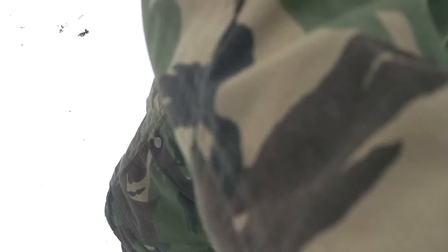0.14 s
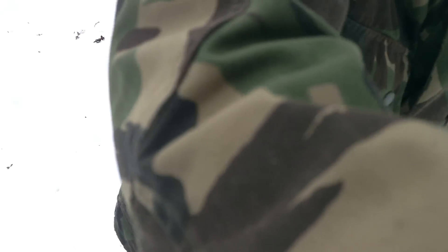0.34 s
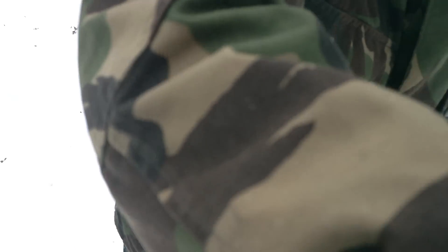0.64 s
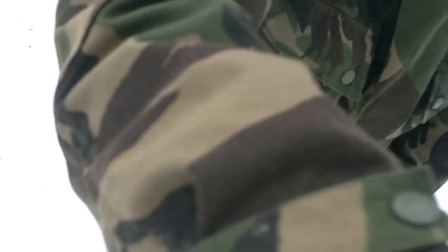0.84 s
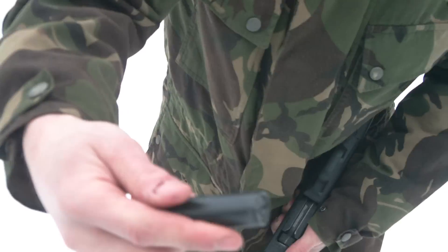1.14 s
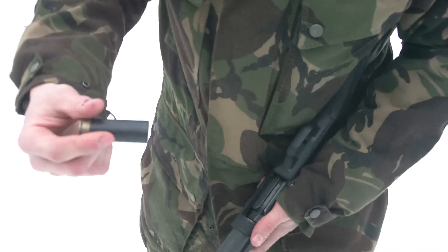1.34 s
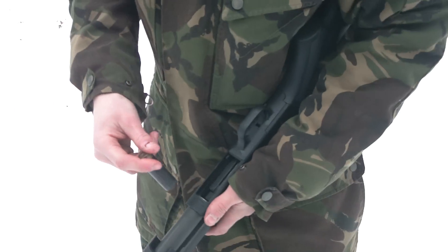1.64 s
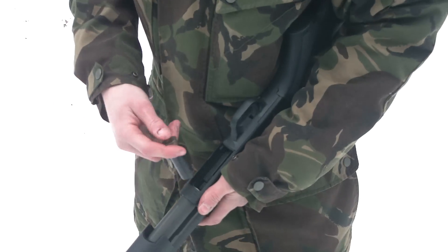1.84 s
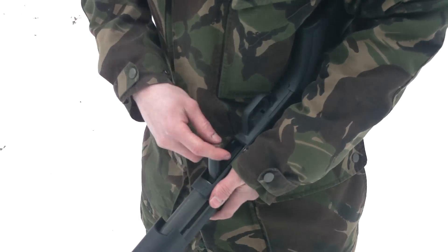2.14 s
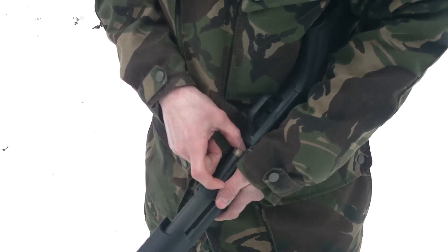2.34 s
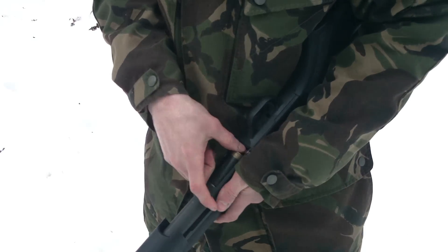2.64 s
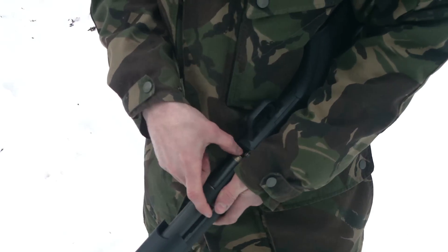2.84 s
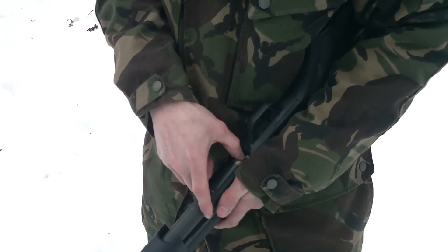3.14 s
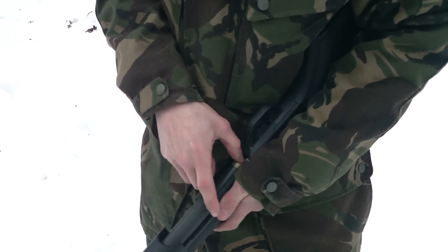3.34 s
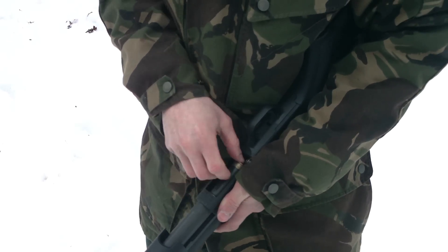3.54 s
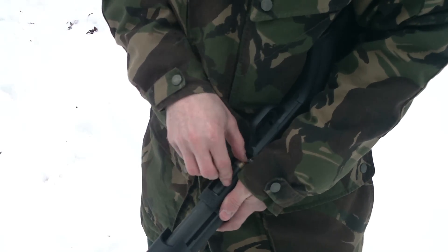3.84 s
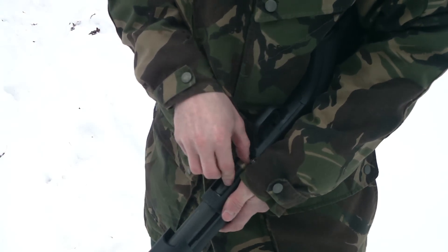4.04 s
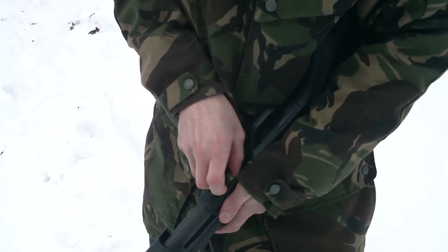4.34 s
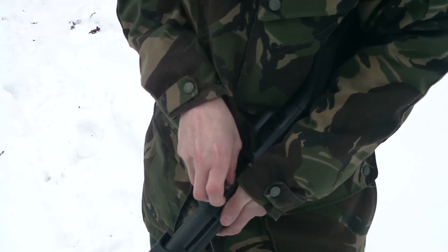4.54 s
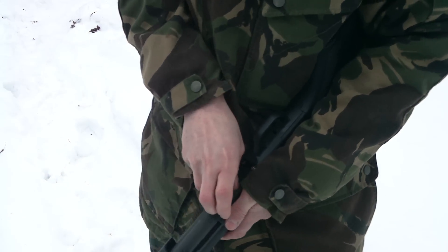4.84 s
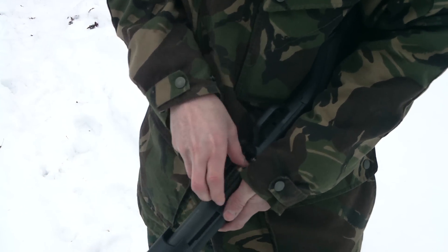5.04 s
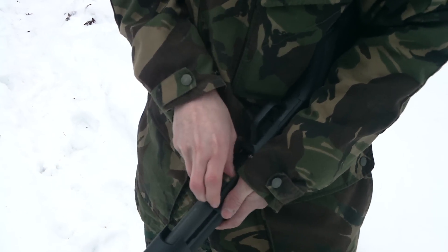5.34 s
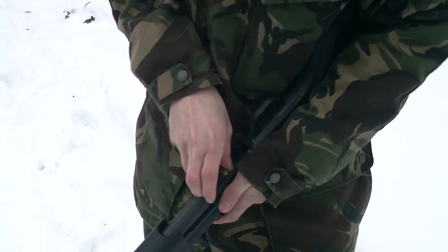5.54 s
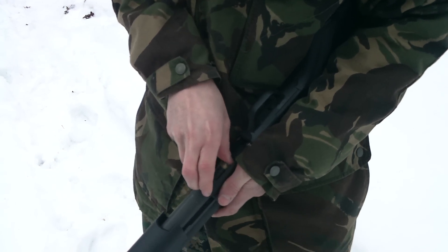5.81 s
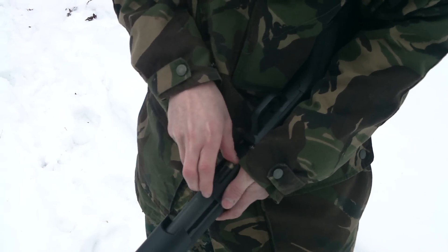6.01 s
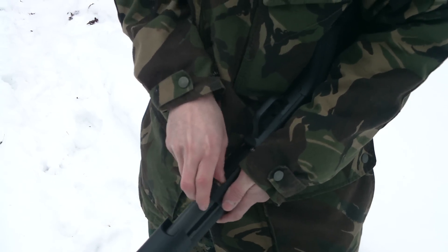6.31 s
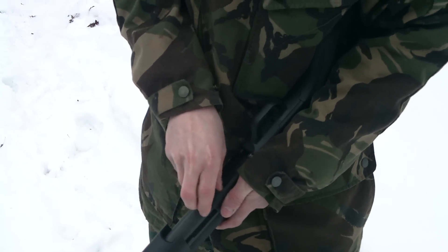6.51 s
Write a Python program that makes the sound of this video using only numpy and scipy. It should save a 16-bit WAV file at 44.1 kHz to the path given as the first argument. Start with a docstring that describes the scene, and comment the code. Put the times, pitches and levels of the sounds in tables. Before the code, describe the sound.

Outdoors, close and dry in stereo, with light hiss and a faint far rumble. From about 0.25 to 1 s a stiff jacket rustles and gives soft, dull padded knocks; a very loud, sharp steel snap hits at 0.77 s. Smaller cloth movements and muffled bumps follow at 1.3, 1.45 and 1.7 s, then the background drops. At 2.25-2.55 s a shell clicks and scrapes briefly on steel, with a crisp single click at 2.93 s. Faint ticks lead to small click clusters at 3.95-4.55 s with short gritty slides. A strong, bright metallic rattle comes at 5.15-5.4 s, while deep wind gusts begin buffeting the microphone. Around 6-6.3 s a slow hollow drag carries faint rising squeaks, followed by hard clicks and rasping slides at 6.2-6.45 s and a last small click at 6.65 s.

```python
"""Shells being thumbed into a shotgun's magazine tube are the main sound, outdoors on snow.
Their rims click and slide on steel: short bursts and dense grit ring the steel and the hollow tube.
The person's stiff jacket rustles and knocks close by: grains of slipping cloth and soft padded blows.
A slow push adds a hollow drag and faint squeaks; far rumble, hiss and gusts are shaped noise below."""
import sys
import numpy as np
from scipy import signal
from scipy.io import wavfile
from scipy.ndimage import map_coordinates

SR = 44100
rng = np.random.default_rng(int(sys.argv[2]) if len(sys.argv) > 2 else 0)


def wrap_up_sound(samples):
    """Save the sound to the file named by the first command line argument, as 16-bit audio."""
    columns = np.atleast_2d(samples).T
    # keep every value between -1 and 1, then stretch to whole-number steps
    tamed = np.clip(columns, -1, 1)
    steps = np.round(tamed * 32767).astype(np.int16)
    wavfile.write(sys.argv[1], SR, steps)


N = 294367
TIME = np.arange(N) / SR

# background of jacket rustle, hiss and far rumble, louder early and quieter after 1.76 s:
# start_s, hiss_db, rumble_db
AIR_LEVELS = [(0, -39, -44.5), (.3, -43.5, -47), (.69, -46.5, -47), (1.4, -48.5, -49.5), (1.7, -47, -48),
              (1.76, -55, -49.5), (4.1, -55, -49.5), (4.57, -52, -50), (6.67, -56.5, -49)]
# gusts on the microphone: start_s, level_db
WIND_LEVELS = [(0, -45), (.37, -49.5), (1.26, -49), (4.36, -50.5), (4.55, -43.5), (4.75, -47), (5.1, -31.5),
               (5.28, -40), (5.35, -27), (5.5, -32.5), (5.7, -38), (5.79, -29.5), (5.84, -36), (5.93, -29),
               (6.02, -44), (6.21, -34), (6.3, -34.5), (6.39, -27), (6.52, -38), (6.67, -48)]
# noise spectra, relative: pitch_hz, level_db (per Hz)
HISS_SPECTRUM = [(700, -3.5), (1500, -3), (2500, -3), (5000, -3), (9000, -5), (12000, -11.5), (15000, -1)]
RUMBLE_SPECTRUM = [(60, 4.5), (130, 2), (250, -2), (500, -3.5), (800, -7.5), (1200, -13.5), (2000, -18),
                   (4000, -29)]
GUST_SPECTRUM = [(18, 7.5), (35, -1), (60, -4), (100, -15.5), (170, -29.5), (300, -74)]
# how alike left and right are in the noises: pitch_hz, likeness (no unit; 1 = the same)
LEFT_RIGHT_LIKENESS = [(30, 0.11), (80, 0.15), (150, 0.52), (380, 0.69), (950, 0.76), (2400, 0.47),
                       (6000, 0.34), (15000, 0.016)]
# stiff cloth rubbing, one row a movement: full_level_s, rise_s, hold_s, fall_t60_s, level_db, creak_hz
RUSTLE_MOVES = [(.265, 0.0074, 0.017, 0.23, -39.5, 830), (0.475, .01, 0.058, 0.081, -43.5, 726),
                (0.605, 0.041, 0.011, 0.13, -38, 634), (0.68, 0.053, .02, 0.055, -44, 686),
                (0.756, 0.072, 0.0098, 0.063, -30, 1680), (0.77, 0.028, 0.029, 0.33, -43, 890),
                (0.916, 0.056, 0.0068, .2, -46, 1030), (1.281, 0.022, 0.088, .12, -44, 705),
                (1.703, .02, 0.013, 0.033, -41, 690)]
# soft knocks of hand and jacket: start_s, level_db, pitch_hz, bright_edge_db (relative), t60_s
SOFT_KNOCKS = [(0.27, -24.5, 237, -2, 0.018), (0.338, -27.5, 1080, -0.5, 0.074),
               (0.339, -32.5, 124, -30, 0.071), (0.288, -27.5, 230, -4, 0.088),
               (0.385, -34, 108, -30, 0.068), (0.414, -21.5, 265, 5.5, 0.033),
               (0.455, -29, 1180, -11, 0.037), (0.475, -22.5, 270, -32, 0.063),
               (0.618, -35, 1100, 4, 0.025), (0.695, -26, 670, -25, 0.075), (0.786, -24.5, 240, -11, 0.029),
               (0.84, -27.5, 467, -0.5, 0.046), (0.928, -28, 1010, -31, 0.15), (0.94, -26, 229, -4, 0.021),
               (0.95, -30.5, 117, -30, 0.14), (1.287, -25, 253, -8.5, 0.12),
               (1.454, -21.5, 610, -43, 0.043), (1.697, -34, 689, -29, 0.057)]
# shell and steel contacts: start_s, level_db, snap_hz, shell_body_db (relative),
# treble_db (relative), chatter_t60_s
SHELL_CLICKS = [(0.6604, -19.5, 7200, -26, -18, 0.015), (0.7672, 2, 4240, -24, -15, 0.0084),
                (0.806, -28, 5500, -4, -19, 0.036), (2.071, -44, 2250, 20.5, -4, 0.036),
                (2.2578, -12, 4970, -4, -6.5, 0.0039), (2.3045, -32, 1890, 10, -13, 0.039),
                (2.352, -40, 4000, 5, -11, 0.016), (2.3855, -13.5, 2730, -11.5, -20, 0.012),
                (2.397, -25, 2600, -20, -25, 0.012), (2.451, -18, 2720, -12, -30, 0.014),
                (2.552, -34, 4800, -25, -1.5, 0.0058), (2.8727, -50, 1720, 22, 15, 0.03),
                (2.9291, -9, 4070, -51, -43, 0.0044), (3.3313, -42, 2800, 9, -27, 0.056),
                (3.4531, -40, 2640, 10, -1, 0.02), (3.6874, -30, 2900, -3, -33.5, 0.015),
                (3.9422, -19, 3980, -16, -14, 0.011), (4.0364, -15.5, 5000, -17, -8.5, 0.028),
                (4.0408, -19, 7400, -5, -17, 0.031), (4.2553, -24.5, 3130, -10, -8.5, 0.014),
                (4.297, -37, 4500, -15, -8, 0.015), (4.39, -19, 3470, -14, -31, 0.027),
                (4.397, -19, 3980, -20, -26, 0.031), (4.4004, -29, 6230, 8, 1.5, 0.019),
                (4.5153, -16.5, 4940, -32, 1, 0.0039), (4.556, -16, 3700, -5.5, -6, 0.027),
                (4.65, -48.5, 2230, 23.5, 4, 0.024), (5.1682, -17, 2930, -10, -12, 0.036),
                (5.175, -19, 6350, -28, -3, 0.032), (5.212, -18.5, 2720, -20, -9, 0.019),
                (5.2187, -8, 7000, -31, -17, 0.03), (5.221, -6, 3650, -14, -2.5, 0.03),
                (5.2257, -9, 4160, -15, -17, 0.023), (5.279, -33, 3930, -25, -25, 0.008),
                (5.3252, -14.5, 4000, -26, -18, 0.026), (5.3505, -5.5, 4460, -12.5, -11.5, 0.019),
                (5.3771, -6.5, 6300, -9, -7, 0.0042), (5.7437, -37, 3280, 12.5, -25, 0.026),
                (5.937, -41, 3030, 4, -3, 0.011), (6.1846, -17.5, 3260, -32, -12.5, 0.012),
                (6.319, -7.5, 4060, -19, -3.5, 0.021), (6.337, -12.5, 3800, -1, -6.5, 0.026),
                (6.405, -11.5, 4670, -12, -3, 0.053), (6.4213, -14.5, 2100, -3, -13, 0.008),
                (6.6474, -28, 5170, 6, 3, 0.027)]
# resonances of receiver, spring and shell: pitch_hz, width_hz, level_db
STEEL_MODES = [(1520, 150, 0), (2100, 450, -5), (2600, 90, 4.5), (3040, 150, -1), (3520, 200, -5),
               (3950, 180, -2), (4380, 190, -1.5), (4830, 180, -1), (5600, 300, -4), (6250, 350, -2),
               (6950, 200, -2)]
# treble resonances of the same contacts: pitch_hz, width_hz, level_db
STEEL_TREBLE_MODES = [(8620, 350, 7), (9370, 620, 3.5), (12130, 1830, 12), (12760, 4860, 6),
                      (16100, 430, 3)]
# dull body of a struck shell and the tube behind it: pitch_hz, width_hz, level_db
SHELL_MODES = [(755, 600, -1.4), (1003, 92, -1.6)]
# shell sliding on steel, one row a stroke: full_pressure_s, rise_s, hold_s, fall_t60_s, level_db,
# pitch_hz, tube_db (relative)
SLIDE_STROKES = [(2.253, 0.001, 0.0039, 0.048, -33, 3140, -2),
                 (2.386, 0.0023, 0.018, 0.057, -39.5, 2520, -6.5),
                 (2.45, 0.00081, 0.0025, 0.13, -39, 3300, -11.5),
                 (4.384, 0.0083, 0.017, 0.065, -42.5, 3570, 4),
                 (4.411, 0.0074, 0.046, 0.088, -51.5, 4100, 9),
                 (4.497, 0.038, 0.012, 0.027, -49.5, 4200, 1),
                 (4.514, 0.0065, 0.0053, 0.16, -35.5, 4030, 2.5),
                 (5.159, 0.039, 0.072, 0.096, -38, 3600, -1), (5.241, .01, 0.078, 0.043, -57.5, 3460, 1),
                 (5.322, 0.037, 0.048, 0.12, -36, 3170, 1.5),
                 (5.376, 0.0051, 0.00088, 0.011, -22.5, 5200, -28),
                 (5.992, 0.061, 0.03, 0.12, -53.5, 3870, 5.5), (6.184, 0.19, 0.049, 0.13, -52.5, 4000, 7.5),
                 (6.316, 0.018, 0.03, 0.024, -28.5, 3500, -2), (6.394, 0.034, 0.028, 0.062, -31, 4420, 4),
                 (6.471, 0.047, 0.061, 0.17, -53, 4550, 6), (6.599, 0.021, 0.024, 0.03, -53.5, 4030, 12.5),
                 (6.647, 0.027, .008, 0.051, -36, 3730, 1.5)]
# air in the magazine tube: pitch_hz, width_hz, level_db
TUBE_MODES = [(593, 72, -9), (704, 63, -14), (992, 110, 2)]
# hollow body of a shell pushed slowly along the port: start_s, pitch_hz, level_db
DRAG_PATH = [(5.97, 557, -64), (6.05, 740, -54), (6.14, 600, -47.5), (6.26, 615, -50), (6.33, 520, -52)]
# faint rising tones in one slow stroke: full_level_s, rise_s, hold_s, fall_t60_s, level_db, pitch_hz
SQUEAK_TONES = [(6.055, .03, .085, .05, -63, 2250), (6.05, .03, .21, .05, -65, 3540)]

WIND_PAN_DB = 1.5   # the left port is more exposed
RISE_DB = 30.5      # a movement swells up from this far below its level
CREAK_DB_PER_OCTAVE, CREAK_WANDERS_OCTAVES = -45, .12   # fall-off around the creak, and its wandering
FOLDS_DB, FOLDS_DB_PER_OCTAVE = -12, -1                 # the other folds, level given at 600 Hz
GRIT_PER_S, GRIT_SPREAD_DB = 4300, 2
GRIP_SPREAD_DB = 1.5     # each grip damps other modes
TUBE_FLUTTER_DB = 4      # the shell opens and blocks the tube as it moves
SLIDE_TREBLE_DB, TREBLE_DB_PER_OCTAVE = -5, 14   # treble of a 4 kHz stroke; brighter strokes carry more
RASP_DB, TREBLE_RASP_DB = 1.5, -2   # bare rasp beside the steel modes and beside their treble
DRAG_LOWPASS_HZ = 130    # the band reaches this far to each side of its pitch
SQUEAK_HZ_PER_S, SQUEAK_WAVER_HZ, SQUEAK_FLUTTER_DB = 600, 30, 2.5
# the person leans in on one side: left leads, until the step back brings both sides level in time
SIDE_LEAD_S, STEP_FROM_S, STEP_TO_S = .000043, .9, 1.1
PAN_DB = 0.64            # left stays this much louder throughout
ECHO_S, ECHO_DB = 0.0049, -22
SCATTER_DB, SCATTER_HZ = -6, 6750
SCATTER_PER_S = 9.7      # hands and sleeves keep moving


def amp(db):
    """Turn a level in dB into a gain."""
    return 10 ** (np.asarray(db) / 20)


def rms_one(x):
    """Scale to an average strength (rms) of 1."""
    return x / np.sqrt(np.mean(x ** 2) + 1e-20)


def peak_one(x):
    """Scale to a peak of 1."""
    return x / np.max(np.abs(x))


def in_time(rows):
    """Draw straight lines between the rows of a table, giving one value per sample and column."""
    s, *columns = np.transpose(rows)
    return np.array([np.interp(TIME, s, c) for c in columns])


def at_hz(points, hz):
    """Read a spectrum at a pitch, with pitch on a log axis."""
    table = np.array(points)
    return np.interp(np.log(hz), np.log(table[:, 0]), table[:, 1])


def drift(rate):
    """Slow random wandering of spread 1: smoothed noise, made once every 40 samples."""
    r = np.exp(-80 * np.pi * rate / SR)
    white = rng.standard_normal(N // 40 + 2002)
    slow = signal.lfilter([1], [1, -2 * r, r * r], white)[2000:]   # skip the filter's start
    return np.interp(np.arange(N) / 40, np.arange(len(slow)), rms_one(slow))


def resonate(x, modes, extra_db=0):
    """Ring several resonances side by side, with alternating signs; narrow ones ring longer."""
    out = 0
    extra_db = extra_db + np.zeros(len(modes))
    for k, ((hz, width, db), more_db) in enumerate(zip(modes, extra_db)):
        r = np.exp(-np.pi * width / SR)
        poles = [1, -2 * r * np.cos(2 * np.pi * hz / SR), r * r]
        ring = signal.lfilter([(1 - r * r) / 2, 0, (r * r - 1) / 2], poles, x)
        out = out + (-1) ** k * amp(db + more_db) * ring
    return out


def add(out, sound, s):
    """Mix a short sound in at time s."""
    at = round(s * SR)
    out[at:at + len(sound)] += sound[:N - at]


def movement(s, rise_s, hold_s, t60, db):
    """Span and gain of a movement that swells, holds and dies away."""
    rise_s, hold_s, t60 = np.maximum([rise_s, hold_s, t60], .001)
    span = slice(int((s - rise_s) * SR), min(int((s + hold_s + t60) * SR), N))
    t = TIME[span] - s
    swell_db = RISE_DB * np.minimum(t / rise_s, 0)
    fall_db = -60 * np.maximum(t - hold_s, 0) / t60
    return span, amp(db + swell_db + fall_db)


def grit(per_s, spread_db, clumps_db):
    """Tiny random contacts of uneven size that come in louder and softer clumps."""
    sizes = amp(spread_db * np.minimum(rng.exponential(1, N), 5)) * rng.choice([-1, 1], N)
    touching = rng.random(N) < per_s / SR
    return sizes * touching * amp(clumps_db * drift(71)) + 1e-18


def banded_noise(spectrum, patchy_db, flicker):
    """Half-octave bands of stereo noise, each with its own level, flicker and likeness; rms 1."""
    lowest = spectrum[0][0]
    edges = lowest * 2 ** np.arange(0, np.log2(16000 / lowest), .5)
    out, together, white = 0, drift(1.16), rng.standard_normal((2, 2, N))
    for k, low in enumerate(edges[edges < spectrum[-1][0]]):
        high = min(low * np.sqrt(2), .45 * SR)
        band = signal.butter(2, [low, high], "band", fs=SR, output="sos")
        mid, side = signal.sosfilt(band, white[k % 2])   # neighbouring bands use separate noise
        hz = np.sqrt(low * high)
        alike = np.clip(at_hz(LEFT_RIGHT_LIKENESS, hz), -1, 1)
        gain = amp(at_hz(spectrum, hz) + patchy_db * (.4 * together + drift(flicker)))
        out = out + gain * (np.sqrt(1 + alike) * mid + np.sqrt(1 - alike) * side * [[1], [-1]])
    return rms_one(out)


def air():
    """Jacket rustle, hiss and far rumble: two wide stereo noises, louder early and quieter later."""
    hiss_db, rumble_db = in_time(AIR_LEVELS)
    hiss = amp(hiss_db) * banded_noise(HISS_SPECTRUM, patchy_db=2.0, flicker=11.0)
    return hiss + amp(rumble_db) * banded_noise(RUMBLE_SPECTRUM, patchy_db=.6, flicker=9)


def wind():
    """Gusts press on the microphone as deep, patchy noise, stronger at the left port."""
    ports = amp([[WIND_PAN_DB / 2], [-WIND_PAN_DB / 2]])
    gusts = banded_noise(GUST_SPECTRUM, patchy_db=3.5, flicker=16.0)
    return ports * amp(in_time(WIND_LEVELS)[0]) * gusts


def rustle():
    """Folds of cloth slip in clumped grains; folds near the creak pitch speak loudest."""
    slips, out = grit(1500, 3.5, clumps_db=3), np.zeros(N)
    pitches = np.geomspace(200, 4500, num=32)   # one per fold, in Hz
    folds = np.array([(-1) ** k * rms_one(resonate(slips, [(hz, .09 * hz, 0)]))
                      for k, hz in enumerate(pitches)])
    others_db = FOLDS_DB + FOLDS_DB_PER_OCTAVE * np.log2(pitches / 600)
    wander = CREAK_WANDERS_OCTAVES * drift(45)
    for *shape, creak_hz in RUSTLE_MOVES:
        span, level = movement(*shape)
        octaves_off = np.abs(np.log2(creak_hz / pitches)[:, None] + wander[span])
        fold_db = np.maximum(CREAK_DB_PER_OCTAVE * octaves_off, others_db[:, None])
        out[span] += level * np.sum(amp(fold_db) * folds[:, span], axis=0)
    return out


def knocks():
    """A soft blow on padded cloth: a push and a dying puff around one dull pitch, with a bright edge."""
    out, t = np.zeros(N), np.arange(6000) / SR
    chance = rng.standard_normal((len(SOFT_KNOCKS), len(t)))
    for (s, db, hz, bright_db, t60), draw in zip(SOFT_KNOCKS, chance):
        soft_start = np.minimum(t / 0.00086, 1) ** 2
        force = draw * amp(-60 * t / max(t60, .002)) * soft_start + 1e-18
        # the push, once the padding is pressed flat
        force += 1.75 * np.exp(-((t - .0025) / 0.00023) ** 2)
        body = resonate(force, [(hz, 0.26 * hz, 0), (250, 60, -2), (0.57 * hz, hz, -14)])
        edge = resonate(force, [(2090, 4940, -0.71), (2780, 4350, -1.36)])
        add(out, amp(db) * (peak_one(body) + amp(bright_db) * peak_one(edge)), s)
    return out


def steel(force, hz, chance_db=0):
    """Ring the steel modes, strongest near the pitch that the contact excites."""
    octaves_off = np.abs(np.log2(np.array(STEEL_MODES)[:, 0] / hz))
    return resonate(force, STEEL_MODES, -13 * octaves_off + chance_db)


def clicks():
    """A hard touch and a few ms of uneven bounces: a broad snap, with steel and shell ringing behind."""
    out, t = np.zeros(N), np.arange(3000) / SR
    chance = rng.standard_normal((len(SHELL_CLICKS), 3100))   # bounces, then chance for the modes
    for (s, db, hz, body_db, treble_db, t60), draw in zip(SHELL_CLICKS, chance):
        bounces = draw[:len(t)]
        force = bounces * np.abs(bounces) * amp(-60 * t / max(t60, .001)) + 1e-18
        treble_chance_db = 1.0 * draw[len(t):][:len(STEEL_TREBLE_MODES)]
        treble = resonate(force, STEEL_TREBLE_MODES, treble_chance_db)   # the chatter is bright
        force[0] = 16      # the first touch is the hardest
        broad = [(hz, 0.85 * hz, 0)]
        snap = peak_one(resonate(resonate(force, broad), broad))
        ring = peak_one(steel(force, hz, 1.5 * draw[-len(STEEL_MODES):]))
        sound = peak_one(snap + amp(-4.5) * ring)
        sound += amp(treble_db) * peak_one(treble)
        sound += amp(body_db) * peak_one(resonate(force, SHELL_MODES))
        add(out, amp(db) * sound, s)
    return out


def slides():
    """Dense grit, shed as a shell rubs along steel, rings steel and tube."""
    rub = grit(GRIT_PER_S, GRIT_SPREAD_DB, clumps_db=2.2)
    tube = rms_one(resonate(rub, TUBE_MODES))
    tube = rms_one(tube * amp(TUBE_FLUTTER_DB * drift(30)))
    # the same contacts with random signs, so that rasp and ringing do not cancel
    loose = rub * rng.choice([-1, 1], N)
    bare = signal.sosfilt(signal.butter(3, 8200, "high", fs=SR, output="sos"), loose)
    treble = rms_one(resonate(rub, STEEL_TREBLE_MODES)) + amp(TREBLE_RASP_DB) * rms_one(bare)
    out = np.zeros(N)
    grips = GRIP_SPREAD_DB * rng.standard_normal((len(SLIDE_STROKES), len(STEEL_MODES)))
    for (*shape, hz, tube_db), grip_db in zip(SLIDE_STROKES, grips):
        span, level = movement(*shape)
        treble_db = SLIDE_TREBLE_DB + TREBLE_DB_PER_OCTAVE * np.log2(hz / 4000)
        rasp = resonate(resonate(loose[span], [(hz, 1.2 * hz, 0)]), [(hz, 2 * hz, 0)])
        stroke = rms_one(steel(rub[span], hz, grip_db)) + amp(RASP_DB) * rms_one(rasp)
        stroke += amp(tube_db) * tube[span] + amp(treble_db) * treble[span]
        out[span] += level * stroke
    return out


def drag():
    """A band of clumped grit around a pitch that moves with the shell."""
    hz, db = in_time(DRAG_PATH)
    lowpass = signal.butter(2, DRAG_LOWPASS_HZ, fs=SR, output="sos")
    slow = signal.sosfilt(lowpass, grit(3000, 2.5, clumps_db=2))
    moving = (TIME > DRAG_PATH[0][0]) & (TIME < DRAG_PATH[-1][0])
    # multiplying by a sine lifts the slow grit up to the moving pitch
    return moving * amp(db) * rms_one(slow * np.sin(2 * np.pi * np.cumsum(hz) / SR))


def squeaks():
    """Wavering, fluttering near sines that climb slowly."""
    out = np.zeros(N)
    for *shape, hz in SQUEAK_TONES:
        span, level = movement(*shape)
        climb = SQUEAK_HZ_PER_S * (TIME[span] - shape[0])
        pitch = hz + climb + SQUEAK_WAVER_HZ * drift(60)[span]
        flutter = amp(SQUEAK_FLUTTER_DB * drift(40)[span])
        tone = np.sqrt(2) * np.sin(2 * np.pi * np.cumsum(pitch) / SR)
        out[span] += level * flutter * tone
    return out


def nearby(x):
    """Direction sets lead and balance; the ground returns a dull echo; treble scatters to each side."""
    lead_s = np.interp(TIME, [STEP_FROM_S, STEP_TO_S], [SIDE_LEAD_S, 0])
    late = map_coordinates(x, [np.arange(N) - lead_s * SR], order=3)
    pair = np.array([x, late]) * amp([[PAN_DB / 2], [-PAN_DB / 2]])
    delayed = np.pad(pair, ((0, 0), (round(ECHO_S * SR), 0)))[:, :N]
    echo = signal.lfilter([.5], [1, -.5], delayed)
    t = np.arange(220) / SR
    scatter = rms_one(rng.standard_normal(len(t)) * amp(-60 * t / 0.0086)) / np.sqrt(len(t))
    bright = signal.sosfilt(signal.butter(2, SCATTER_HZ, "high", fs=SR, output="sos"), x)
    side = amp(SCATTER_DB) * drift(SCATTER_PER_S) * signal.lfilter(scatter, [1], bright)
    return pair + amp(ECHO_DB) * echo + side * [[1], [-1]]   # opposite signs left and right


def scene():
    """Gun and jacket in front, with air and wind around."""
    around = air() + wind()
    jacket = rustle() + knocks()
    gun = clicks() + slides() + drag() + squeaks()
    return nearby(jacket + gun) + around


def record(dry):
    """Limit the peaks, then soften the top from about 16 kHz and cut it at 16640 Hz."""
    soften = signal.cheby2(8, 16, 1.02 * 15700, fs=SR, output="sos")   # 16 dB down
    cutoff = signal.cheby2(12, 70, 16640, fs=SR, output="sos")         # 70 dB down
    dull = signal.sosfilt(soften, np.clip(dry, -1, 1))
    return signal.sosfilt(cutoff, dull)


dry = scene()
out = record(dry)
wrap_up_sound(out)
```